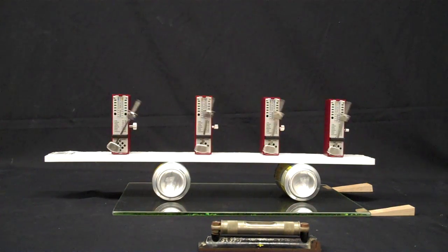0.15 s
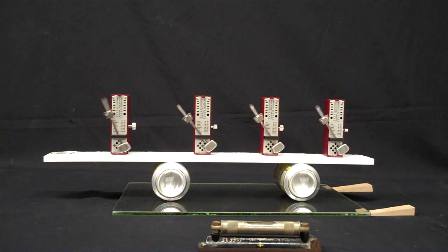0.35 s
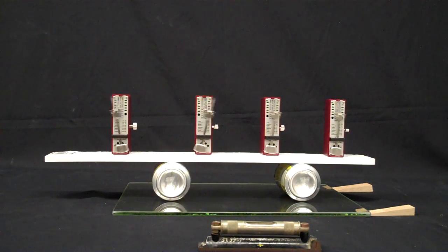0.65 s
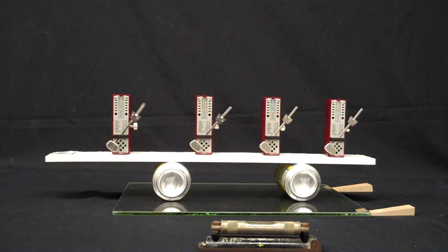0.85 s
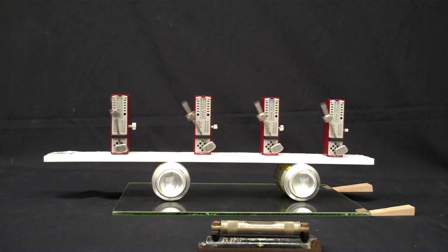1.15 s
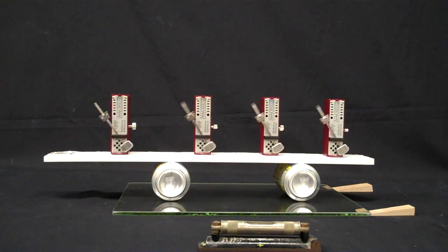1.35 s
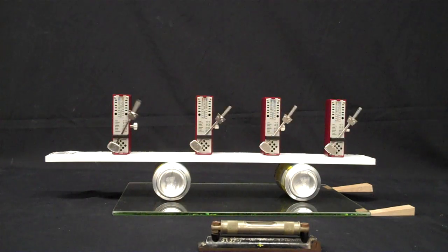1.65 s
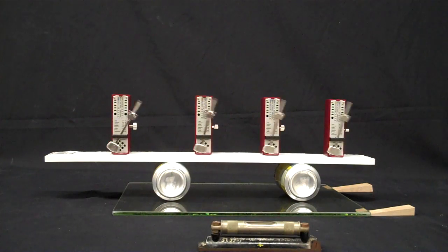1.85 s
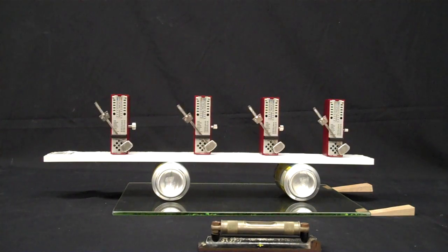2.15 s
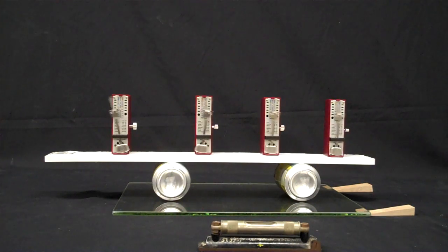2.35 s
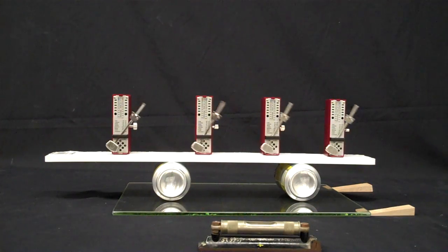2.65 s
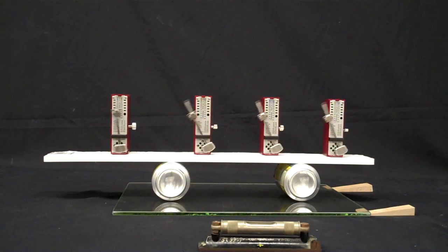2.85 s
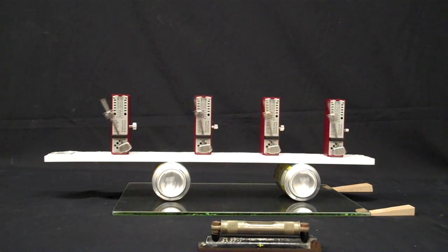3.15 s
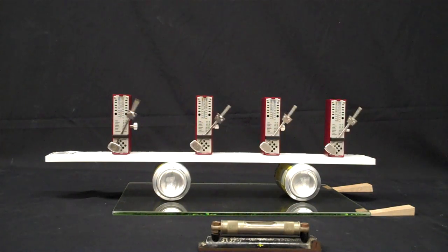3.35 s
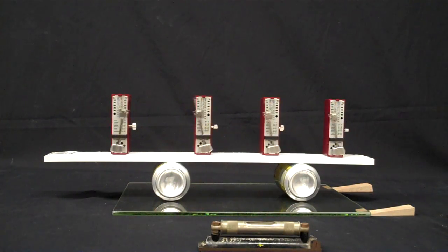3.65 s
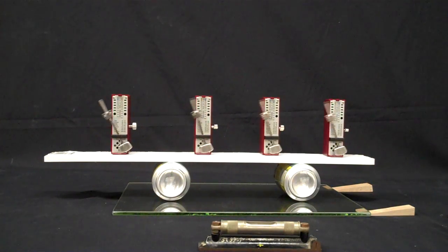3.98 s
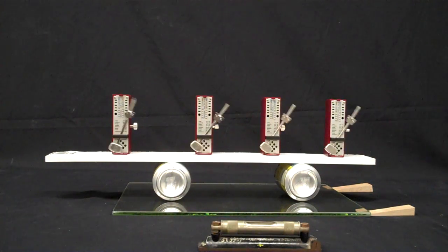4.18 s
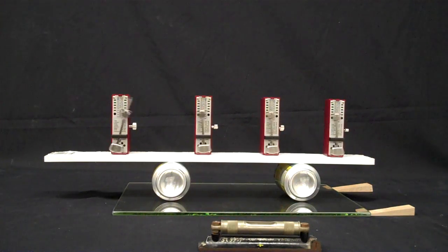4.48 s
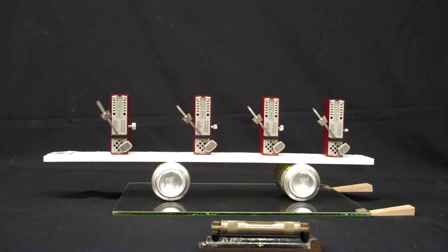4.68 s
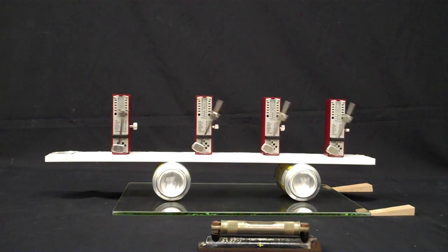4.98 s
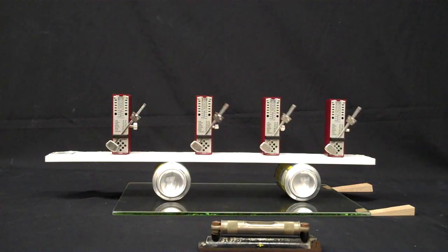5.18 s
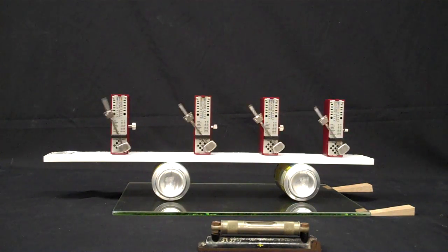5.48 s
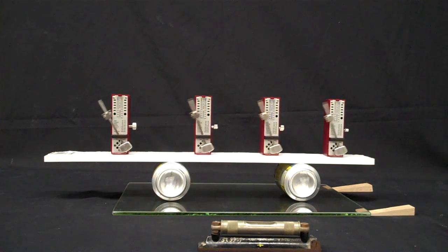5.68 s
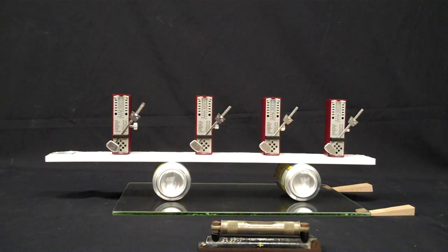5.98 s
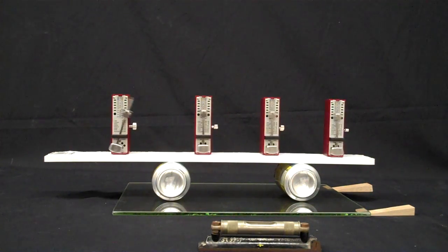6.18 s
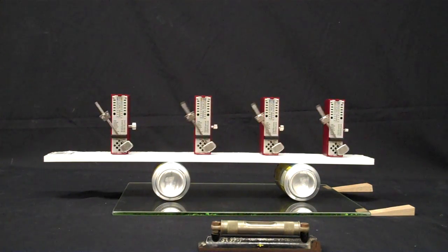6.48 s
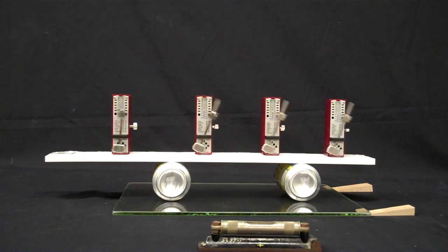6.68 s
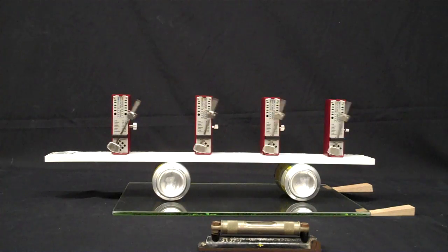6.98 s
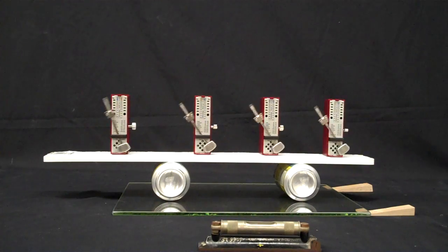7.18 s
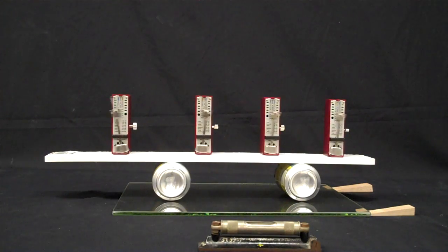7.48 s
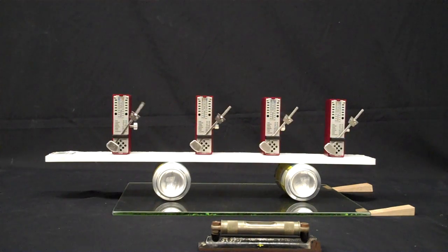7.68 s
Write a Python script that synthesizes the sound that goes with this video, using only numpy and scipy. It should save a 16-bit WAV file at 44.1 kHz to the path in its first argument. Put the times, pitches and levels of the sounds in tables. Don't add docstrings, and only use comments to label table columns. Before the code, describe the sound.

Four small clockwork metronomes tick at a common pace for about eight seconds in a live lecture room. The first cluster falls near 0.33 s, then others at about 0.77, 1.2 and 1.63 s, continuing every 0.43 s until about 7.6 s. In each, three metronomes strike within a few hundredths of a second, making a ragged, bright plastic clack; the fourth lags as a distinct click, about 0.08 s behind early on and still about 0.06 s behind at the end. Alternate swings differ slightly in tone and strength. Each blow is dry, bassless and damped, with minute bounces, then a dense wall echo that fades across the gap. Underneath, constantly, a thin midrange fan whine around 685 Hz beats several times a second over soft ventilation rush and hiss. The stereo microphones overload on the loudest ticks, adding harsh crackle, especially on the left.

```python
import sys
import numpy as np
from scipy import signal
from scipy.fft import rfft, irfft
from scipy.io import wavfile
from scipy.ndimage import uniform_filter1d

SR = 44100
rng = np.random.default_rng(int(sys.argv[2]) if len(sys.argv) > 2 else 0)


def amplitude_ratio(level_db):
    exponent = np.asarray(level_db, float) / 20
    return 10 ** exponent


def materialize(psi):
    bounded = np.clip(np.atleast_2d(psi).T, -1, 1)
    quanta = np.round(bounded * 32767).astype(np.int16)
    wavfile.write(sys.argv[1], SR, quanta)


N = 345294
LEAD_S = 0.15

# [t/s, peak level/dB, left overflow/samples]
SLOW_BLOWS = [(-.097, -2, 0), (0.3297, -0.5, 2.5), (.7542, -1, 2.5), (1.188, -1, 0), (1.6136, -2, 0),
              (2.0459, 0.5, 0.5), (2.47, 0, 2), (2.9037, -2, 0), (3.328, -3.5, 2.5), (3.7582, 0.5, 4),
              (4.1854, -0.5, 2.5), (4.616, -1.5, 3), (5.0434, -3, 2.5), (5.4723, -5.5, 0.5),
              (5.9026, -5.5, 0.5), (6.3275, -1, 1.5), (6.7609, -4.5, 2.5), (7.1858, -5, 0.5),
              (7.6174, -3.5, 2)]
QUICK_BLOWS = [(-.072, -5, 0), (0.3585, -4.5, 0), (0.7825, -3.5, 0), (1.2098, -6, 0), (1.6337, -6, 0),
               (2.0626, -6, -0.5), (2.4906, -10, 1), (2.9161, -5.5, 0), (3.3416, -15, -4),
               (3.7671, -3.5, 0), (4.1962, -1, 1), (4.6218, -6.5, 0), (5.0513, -2, 3), (5.474, -4, 1),
               (5.907, -3.5, 0), (6.326, -13, 0), (6.7577, -5.5, -0.5), (7.1837, -4.5, 0),
               (7.6116, -4.5, 0.5)]
MIDDLE_BLOWS = [(-.085, -1, 0), (0.3436, -1, 1), (.779, -3.5, 1), (1.1981, -1, 1), (1.6319, -1, 5.5),
                (2.0512, -3, 1), (2.4883, -2.5, 2.5), (2.905, 0, -1), (3.3411, 0.5, 7.5), (3.7581, -4, -1),
                (4.187, -12, -0.5), (4.6125, -1.5, 0.5), (5.0467, -2.5, 0), (5.467, .5, 1), (5.899, -1, 0),
                (6.3223, -1, 2), (6.7558, -0.5, 2.5), (7.1772, .5, 1.1), (7.6113, -0.5, 0.5)]
LATE_BLOWS = [(-.022, -3.5, 0), (0.4199, -3, 0), (0.8346, -4, 0), (1.277, -2.5, 1.5), (1.6913, -3.5, 0),
              (2.134, -3, 0), (2.5455, -3.5, 0), (2.9868, -3.5, 0), (3.402, -4, 0), (3.8431, -3.5, 0),
              (4.2564, -4.5, 0), (4.6953, -3, 0), (5.1122, -4, 0), (5.5493, -3, 0), (5.9674, -4, 0),
              (6.4019, -3, 0), (6.8216, -3.5, 0), (7.2546, -2, 0), (7.675, -3.5, 0)]
METRONOMES = (SLOW_BLOWS, QUICK_BLOWS, MIDDLE_BLOWS, LATE_BLOWS)


def on_log(hz, table, column):
    table = np.array(table)
    return np.interp(np.log(np.maximum(hz, 1)), np.log(table[:, 0]), table[:, column])


def pair(length, gain, alike):
    mid, side = rfft(rng.standard_normal((2, length)))
    alike = np.clip(alike, -1, 1)
    mid = mid * np.sqrt((1 + alike) / 2)
    side = side * np.sqrt((1 - alike) / 2)
    return irfft(gain * np.array([mid + side, mid - side]), length)


def walk(rate_hz):
    hold = int(SR / rate_hz)
    points = rng.standard_normal(N // 2000)[:N // hold + 1]
    drift = uniform_filter1d(np.repeat(points, hold), hold)[:N]
    return drift / drift.std()


def ticks():
    # [left minus right/dB, hollow/dB, ring/dB, bright/dB]
    voices = [
        [(0.5, 2, 1.2, 2.5), (1.4, 3, 0.5, 2)],
        [(1.2, 2, 1.5, 0.5), (1.5, 3, 1.2, -1.5)],
        [(.3, 3, 2.5, 3), (.6, 1.5, 3, -1.5)],
        [(1.8, 1, 0.2, 0), (2.6, 1.3, 1.1, 1)],
    ]
    events = []
    for place, table in enumerate(METRONOMES):
        for k, (s, peak_db, _) in enumerate(table):
            events.append((place, s, peak_db, *voices[place][k % 2]))
    return events


def metronomes(length):
    # [f/Hz, level/dB, t60/s, left minus right/dB]
    case_modes = [(1390, -50, 0.025, -4), (1360, -28, 0.033, -7), (1909, -7.5, 0.058, -4.5),
                  (2000, -20, 0.026, 3), (2029, -12.5, 0.0063, 4), (2596, -10.5, 0.027, -2.5),
                  (3038, -10, 0.0099, -1.5), (3796, -8.5, 0.012, 0), (4027, -16.5, 0.012, -14),
                  (4806, -10, 0.019, 6.5), (5257, -5.5, 0.022, -7), (5880, -1.5, 0.013, -3.5),
                  (6183, -2.5, 0.0215, -4), (6946, -4.5, 0.01, 5.5), (7190, -8.5, .015, 11),
                  (7822, -6, 0.0112, 12.5), (8610, -13, 0.0133, 15), (9380, -19.5, .01, 17),
                  (10500, -18.5, 0.0031, 12)]
    # [delay/s, level/dB]
    strikes = [
        (-.0024, -31),
        (0, -4),
        (.0011, 0),
        (.0017, -4),
        (.0025, -10),
        (.0033, -13),
        (.0042, -9),
        (.0056, -17),
    ]
    tick_db, detune, phase_spread, port_hz = -8, 0.02, 2.1, 6474
    scatter_db, unrest = 1.5, 0.9
    longest_ring_s, widest_colour_db = 0.014, 5

    hz, mode_db, t60, side_db = np.transpose(case_modes)
    delay, strike_db = np.transpose(strikes)
    decay = np.log(1000) / np.minimum(t60, longest_ring_s)
    t = np.arange(2048) / SR
    out = np.zeros((2, length + 4096))
    blows = np.zeros((len(METRONOMES), 1, length))
    habit = rng.standard_normal((2, len(strikes), len(case_modes)))

    for place, s, peak_db, pan_db, hollow_db, ring_db, bright_db in ticks():
        chance = rng.standard_normal((4, len(strikes), len(case_modes)))
        low_db = hollow_db * (1 + (hz < 1700))
        colour_db = np.where(hz < 2400, low_db, np.where(hz > 7000, bright_db, ring_db * (hz > 5000)))
        colour_db = np.clip(colour_db, -widest_colour_db, widest_colour_db)
        pole = 2j * np.pi * hz * (1 + detune * chance[0, 0]) - decay
        rings = np.exp(pole[:, None] * t)
        for k in range(len(strikes)):
            level_db = tick_db + peak_db + mode_db + colour_db + strike_db[k]
            size = amplitude_ratio(level_db + scatter_db * chance[1, k])
            phase = (phase_spread * habit[0, k] + unrest * chance[2, k]) * (delay[k] > 0)
            apart = (hz / port_hz) ** 2 * (habit[1, k] + unrest * chance[3, k])
            i = int((s + delay[k] + LEAD_S) * SR)
            for c, sign in enumerate((0.5, -0.5)):
                pan = amplitude_ratio(sign * (pan_db + side_db))
                weight = size * pan * np.exp(1j * (phase + sign * apart))
                out[c, i:i + 2048] += (weight @ rings).imag
        blows[place, 0, int((s + LEAD_S) * SR)] += amplitude_ratio(peak_db)

    band = signal.butter(4, (1400, 10500), "bandpass", fs=SR, output="sos")
    return signal.sosfilt(band, out[:, :length]), blows


def room(blows):
    # [f/Hz, t60/s, level/dB, left-right likeness/-1..1]
    decay_bands = [(870, 0.48, -13.5, 0.89), (1370, 0.48, -26, 0.17), (2034, 0.7, -17, 0.51),
                   (2940, 0.57, -14, 0.31), (4140, 0.55, -12.5, -0.24), (6350, .5, -18.5, -0.22),
                   (8400, 0.49, -21, -0.11), (11460, 0.29, -14, 0.15)]
    # [f/Hz, density/dB per Hz]
    echo_colour = [(900, -31), (1250, -7.5), (1650, -10), (1885, -1.5), (2150, -12), (2650, -9),
                   (3300, -16.5), (3800, -10.5), (4500, -14), (5350, -9), (6050, -2), (6700, -2),
                   (7800, -9.5), (10000, -25), (11500, -37)]
    # [f/Hz, left minus right/dB]
    port_tilt = [(1900, -1), (5000, -2), (6000, -7.5), (7000, 8), (8000, 13), (10000, 21.5)]
    wall_s, wall_spread_s, wall_db, build_s = 0.026, 0.022, 2.5, 0.0023
    grain_db, grain_s = 2.5, 0.001

    length = SR
    t = np.arange(length) / SR
    hz = np.arange(length // 2 + 1) * SR / length
    near_walls = np.exp(-0.5 * ((t - wall_s) / wall_spread_s) ** 2)
    build = (1 - np.exp(-t / build_s)) * amplitude_ratio(wall_db * near_walls)
    grain = signal.fftconvolve(rng.standard_normal(length), np.hanning(int(2 * grain_s * SR)), "same")
    build = build * amplitude_ratio(grain_db * grain / grain.std() * np.exp(-t / 0.26))

    colour = amplitude_ratio(on_log(hz, echo_colour, 1))
    centres = np.log(np.array(decay_bands)[:, 0])
    answer = 0
    for k, (_, t60, db, alike) in enumerate(decay_bands):
        share = np.interp(np.log(hz + 1), centres, np.eye(len(decay_bands))[k])
        answer = answer + pair(length, np.sqrt(share) * colour, alike) * amplitude_ratio(db - 60 * t / t60)
    tilt = amplitude_ratio(np.array([[0.5], [-0.5]]) * on_log(hz, port_tilt, 1))
    answer = irfft(rfft(answer) * tilt, length)
    lowpass = signal.butter(8, 10300, fs=SR, output="sos")
    answer = signal.sosfilt(lowpass, answer * build)
    return signal.fftconvolve(blows, answer, axes=1)[:, :blows.shape[1]]


def fans():
    # [t/s, first fan f/Hz, second fan f/Hz]
    blade_tones = [(0.0, 682.02, 689.11), (0.6, 682.46, 689.58), (1.2, 681.88, 689.64),
                   (1.81, 681.24, 690.17), (2.41, 681.34, 689.82), (3.01, 681.78, 690.37),
                   (3.61, 681.79, 689.83), (4.22, 682.53, 690.17), (4.82, 682.57, 689.58),
                   (5.42, 682.45, 689.14), (6.02, 682.62, 689.57), (6.63, 682.43, 688.87),
                   (7.23, 681.82, 689.13), (7.83, 681.89, 690.75)]
    start_turns = (.465, .997)
    # [tone level/dB, octave level/dB]
    fan_levels = [
        (-48.5, -68.5),
        (-54.5, -60),
    ]
    s, *speeds = np.transpose(blade_tones)
    t = np.arange(N) / SR
    out = 0
    for hz, start, (db, octave_db) in zip(speeds, start_turns, fan_levels):
        turn = 2 * np.pi * (np.cumsum(np.interp(t, s, hz)) / SR + start)
        out = out + amplitude_ratio(db + 0.65 * walk(2.73)) * np.cos(turn)
        out = out + amplitude_ratio(octave_db + 4.0 * walk(3.46)) * np.cos(2 * turn)
    return out * amplitude_ratio(np.array([[0.3], [-0.3]]))


def air():
    # [f/Hz, density/dB per Hz]
    air_colour = [(30, -20), (100, -11.5), (247, -10), (374, -1), (560, -6.5), (820, -1.5), (1090, -11),
                  (1410, -7.5), (2100, -14.5), (2700, -15.5), (4800, -19), (7500, -18.5), (9000, -27.5),
                  (14000, -32.5)]
    # [f/Hz, likeness/0..1]
    likeness = [(60, 0.1), (130, .8), (290, 0.95), (640, 0.87), (1400, 0.66), (3000, 0.12), (6800, 0),
                (14000, .01)]
    hz = np.arange(N // 2 + 1) * SR / N
    noise = pair(N, amplitude_ratio(on_log(hz, air_colour, 1)), on_log(hz, likeness, 1))
    return noise / noise.std() * amplitude_ratio(-48.5 + 0.5 * walk(2.34))


def scene():
    lead = int(LEAD_S * SR)
    direct, blows = metronomes(N + lead)
    echoes = sum(room(place) for place in blows)
    return (direct + echoes)[:, lead:] + fans() + air()


def roll_off(x):
    return signal.sosfilt(signal.butter(12, 15500, fs=SR, output="sos"), x)


def record(dry):
    wrap_db, overflow_s = 6, 0.002
    excess = dry - np.clip(dry, -1, 1)
    highpass = signal.butter(2, 1200, "high", fs=SR, output="sos")
    x = dry - signal.sosfiltfilt(highpass, excess)
    for table in METRONOMES:
        for s, _, samples in table:
            count = round(samples)
            if count > 0:
                i = int(s * SR)
                loudest = np.argsort(dry[0, i:i + int(overflow_s * SR)])[-count:]
                x[0, i + loudest] -= amplitude_ratio(wrap_db)
    x = signal.sosfiltfilt(signal.butter(16, 14350, fs=SR, output="sos"), x)
    return roll_off(np.clip(x, -1, 1))


dry = scene()
out = record(dry)
materialize(out)
```